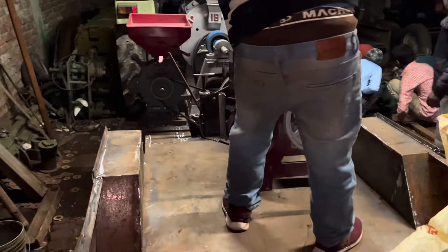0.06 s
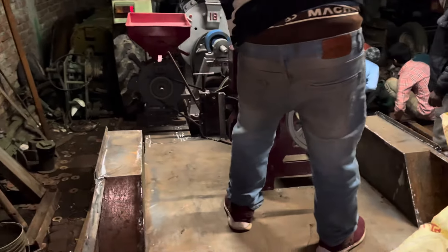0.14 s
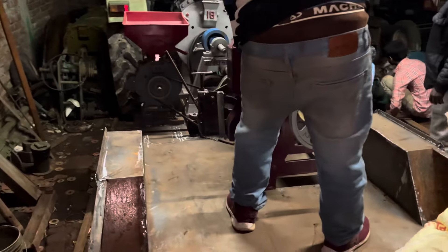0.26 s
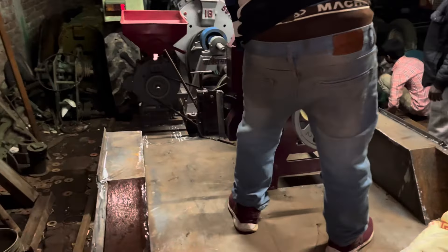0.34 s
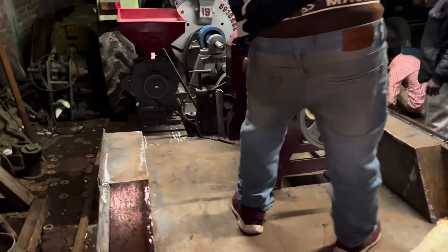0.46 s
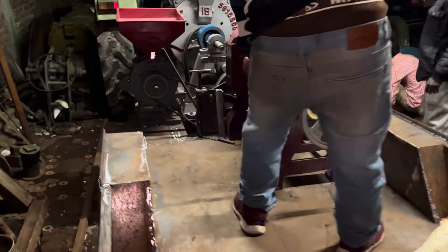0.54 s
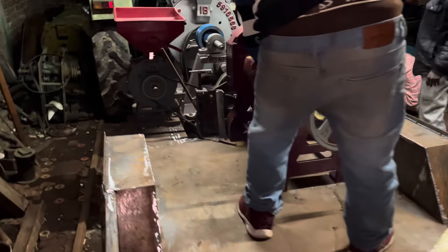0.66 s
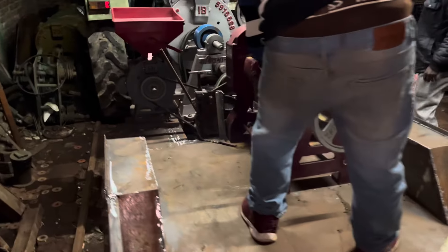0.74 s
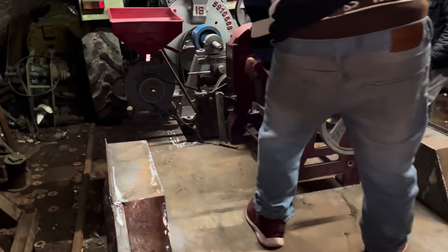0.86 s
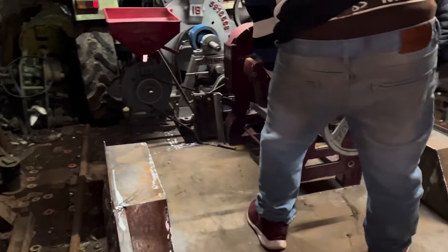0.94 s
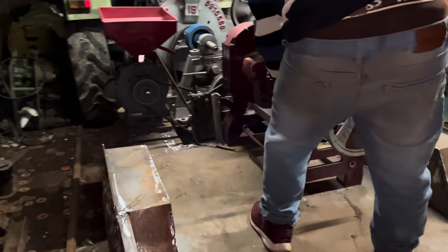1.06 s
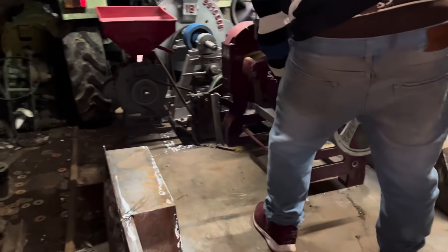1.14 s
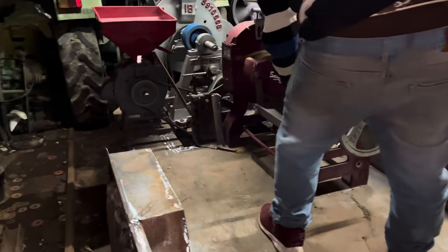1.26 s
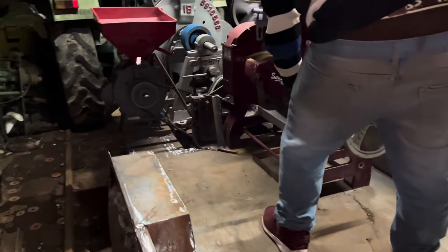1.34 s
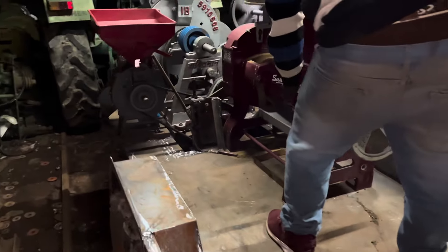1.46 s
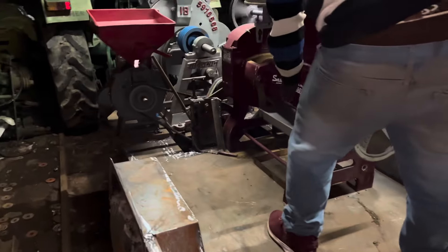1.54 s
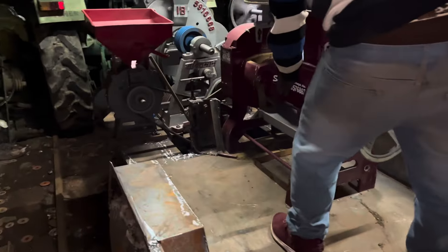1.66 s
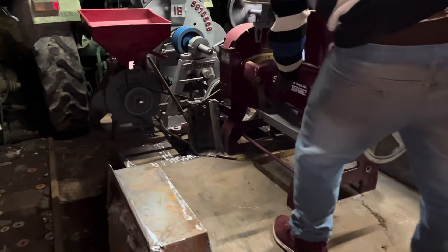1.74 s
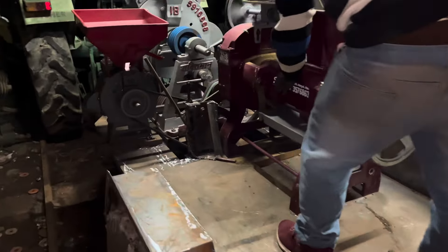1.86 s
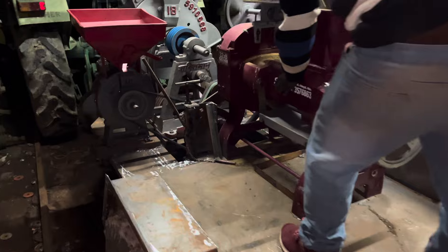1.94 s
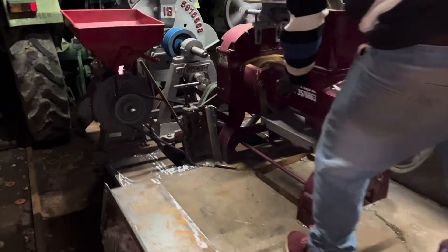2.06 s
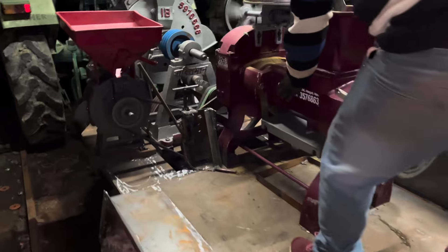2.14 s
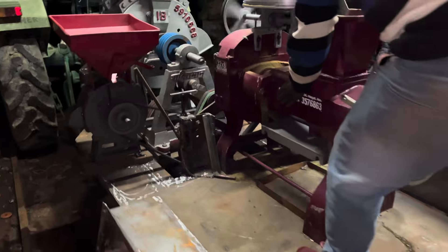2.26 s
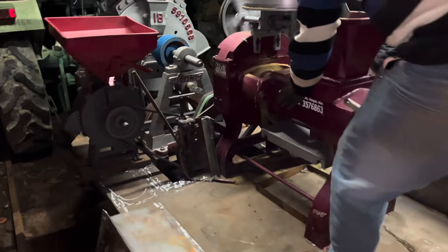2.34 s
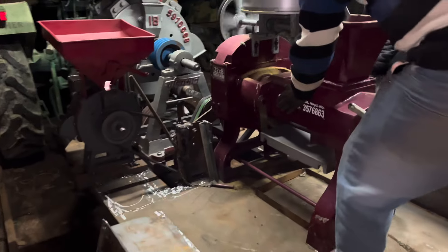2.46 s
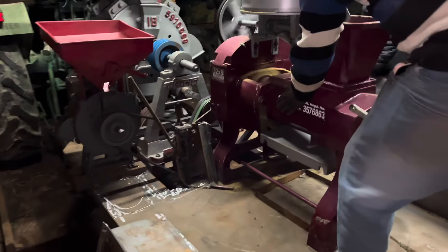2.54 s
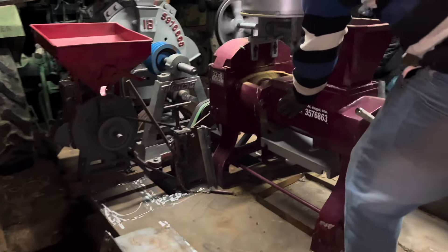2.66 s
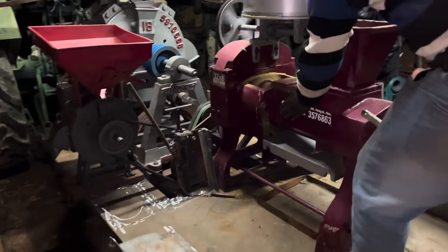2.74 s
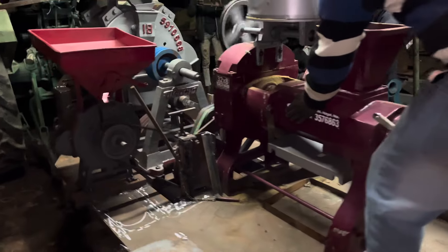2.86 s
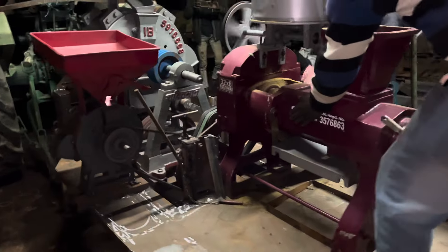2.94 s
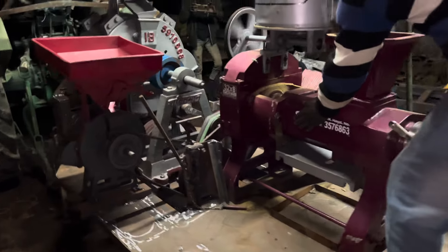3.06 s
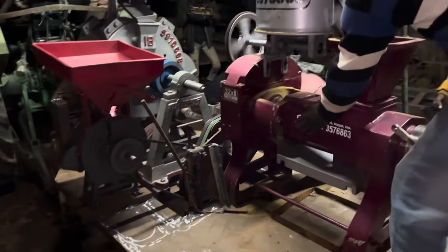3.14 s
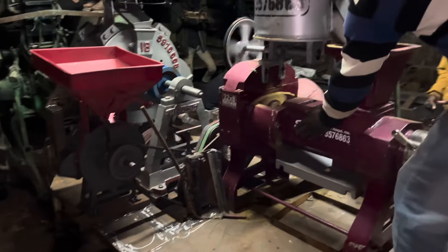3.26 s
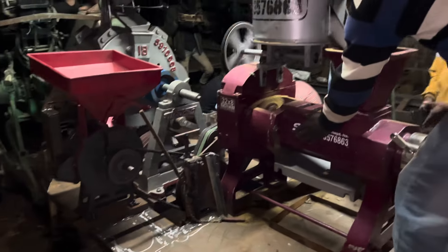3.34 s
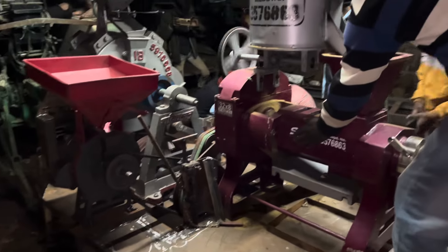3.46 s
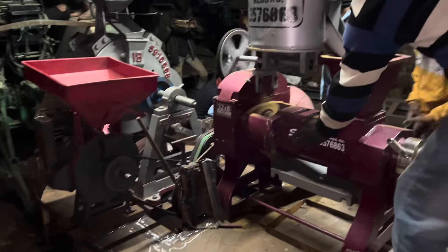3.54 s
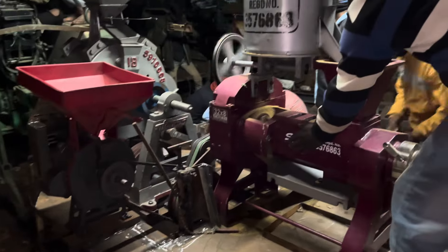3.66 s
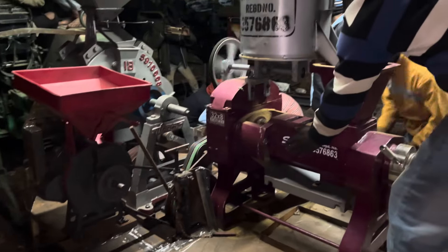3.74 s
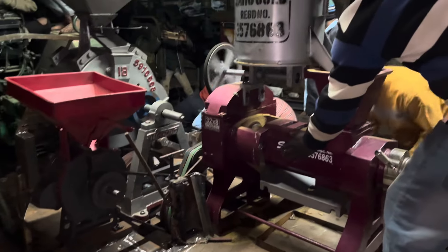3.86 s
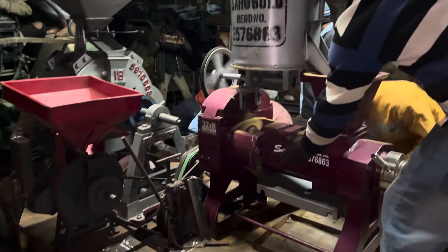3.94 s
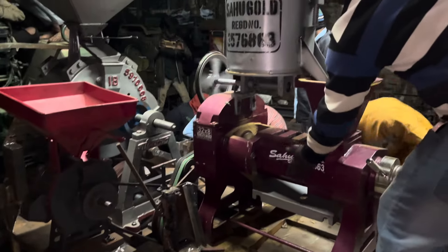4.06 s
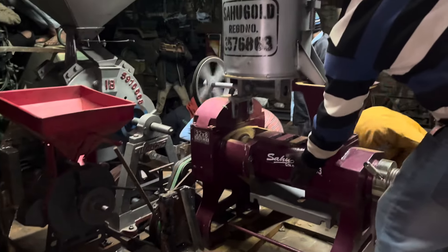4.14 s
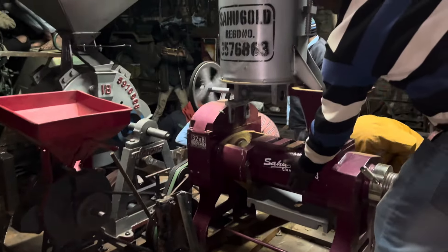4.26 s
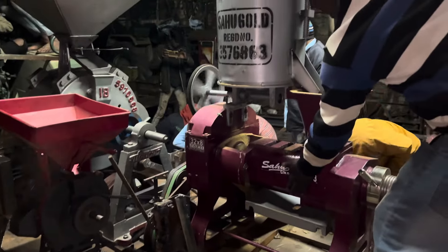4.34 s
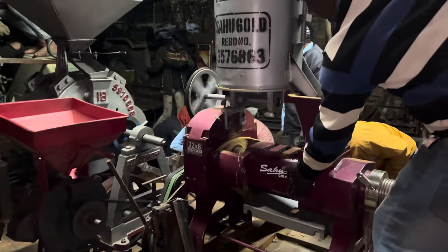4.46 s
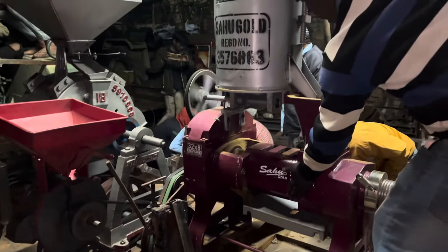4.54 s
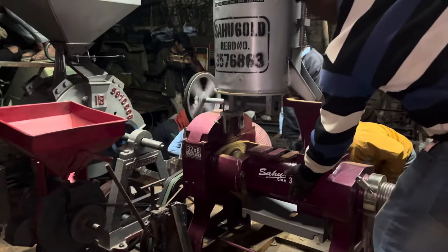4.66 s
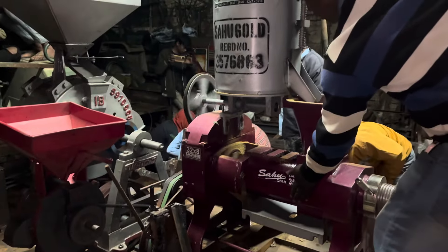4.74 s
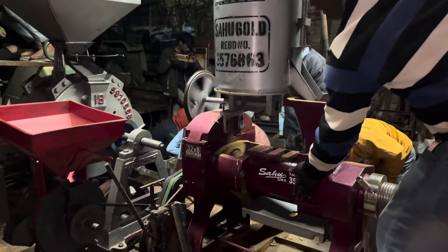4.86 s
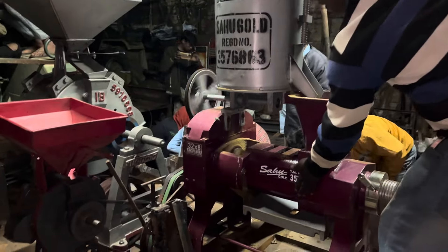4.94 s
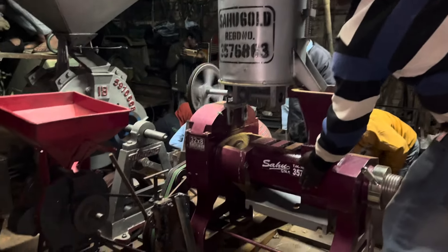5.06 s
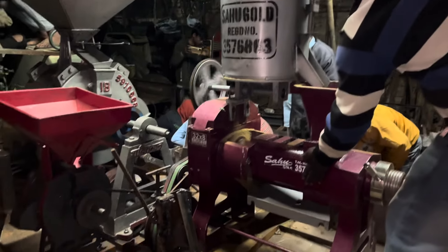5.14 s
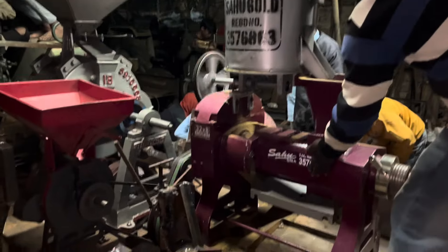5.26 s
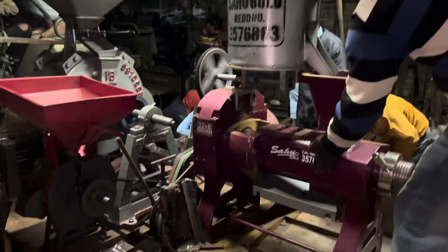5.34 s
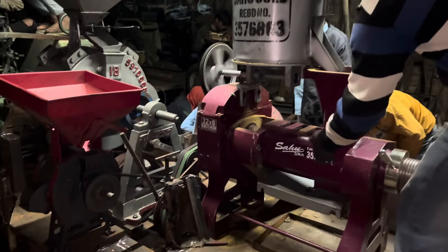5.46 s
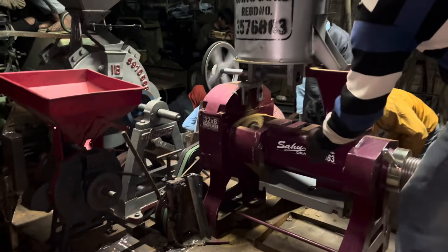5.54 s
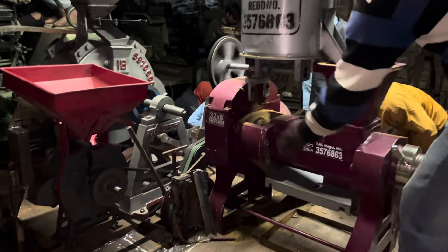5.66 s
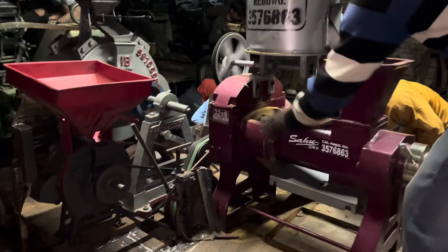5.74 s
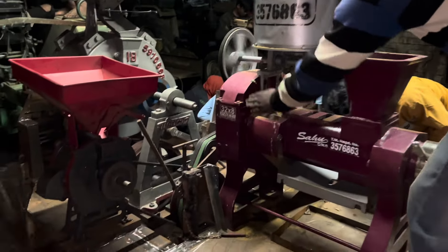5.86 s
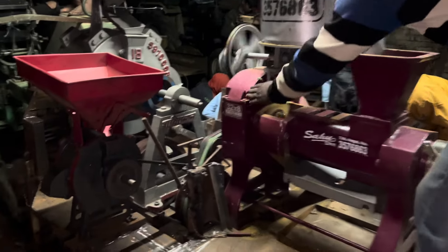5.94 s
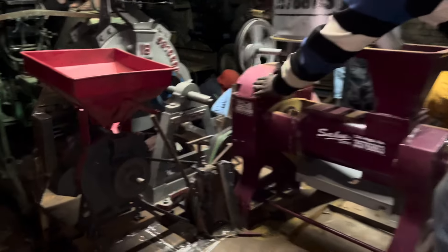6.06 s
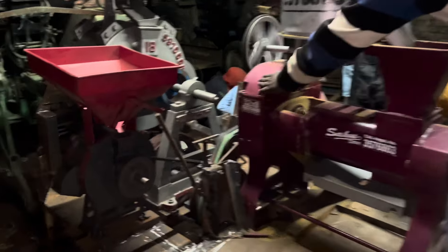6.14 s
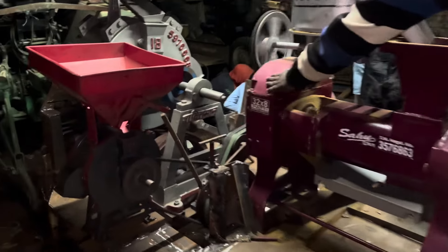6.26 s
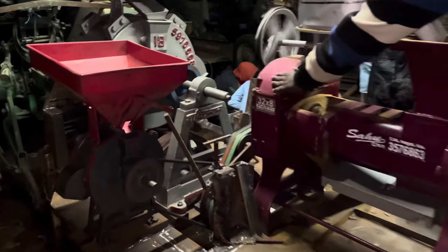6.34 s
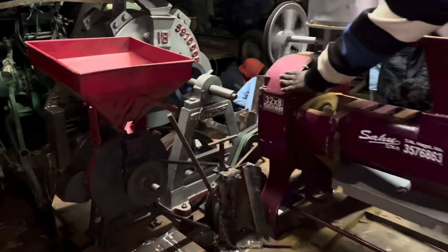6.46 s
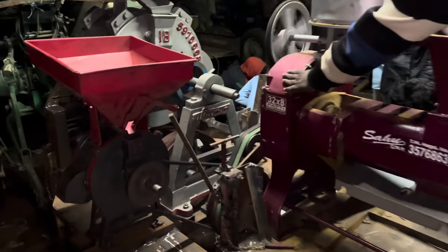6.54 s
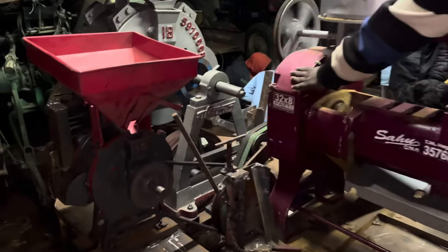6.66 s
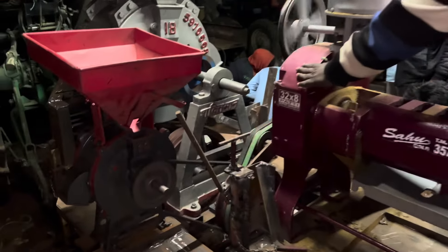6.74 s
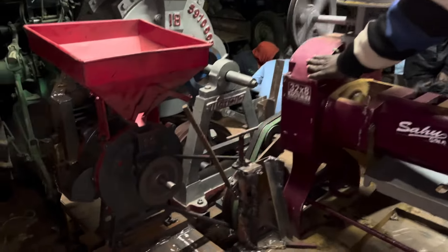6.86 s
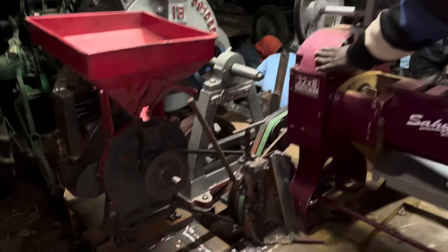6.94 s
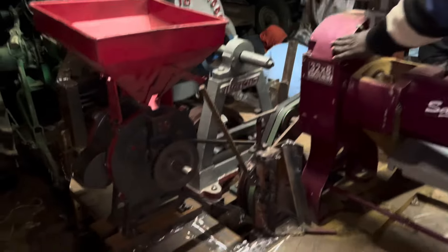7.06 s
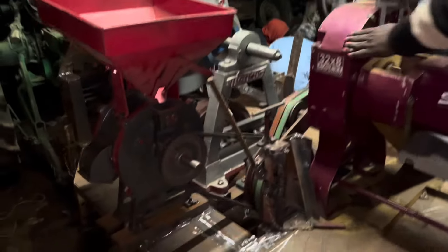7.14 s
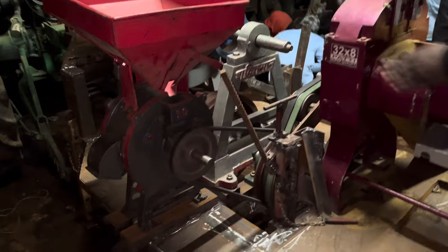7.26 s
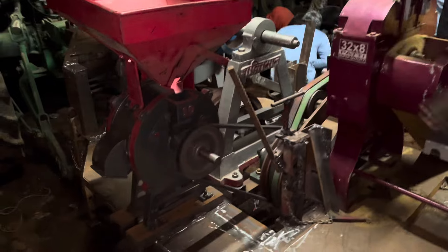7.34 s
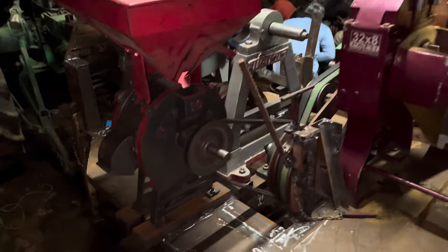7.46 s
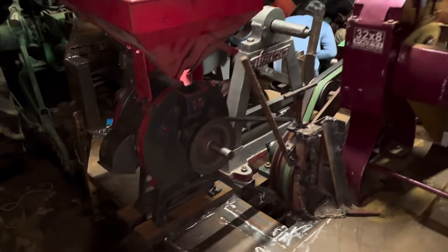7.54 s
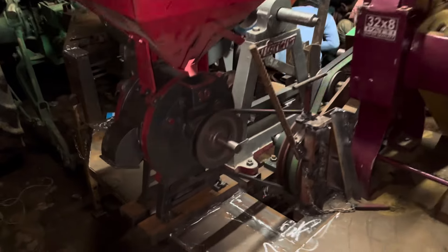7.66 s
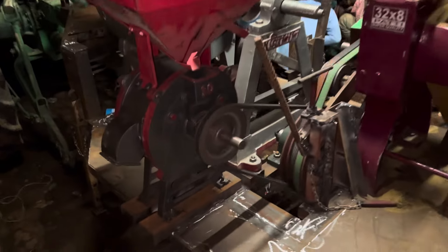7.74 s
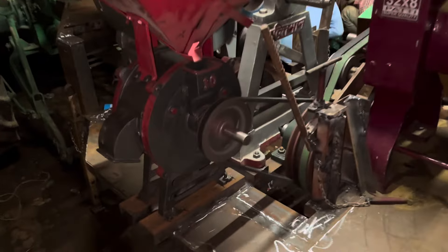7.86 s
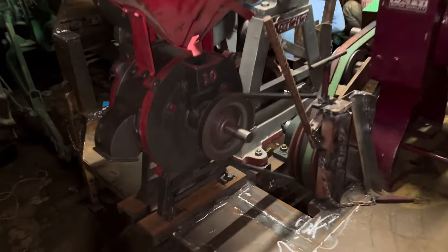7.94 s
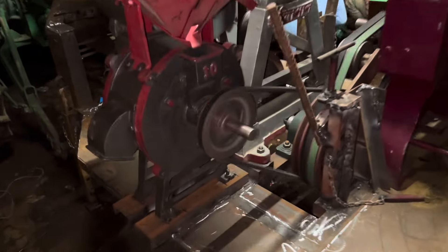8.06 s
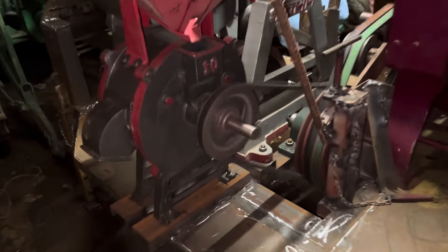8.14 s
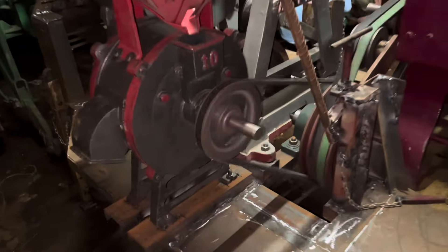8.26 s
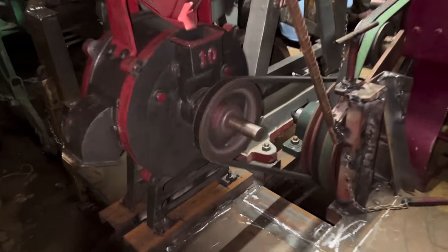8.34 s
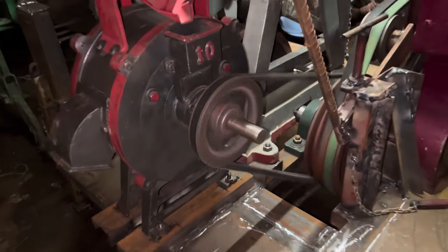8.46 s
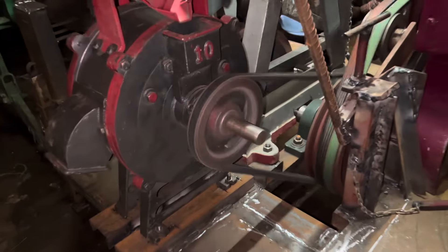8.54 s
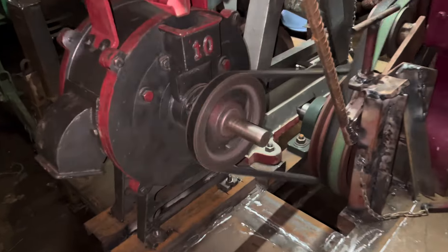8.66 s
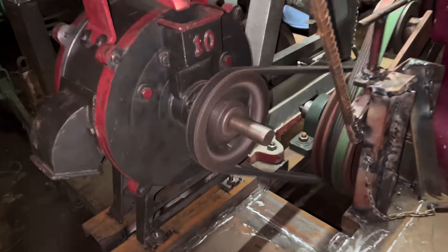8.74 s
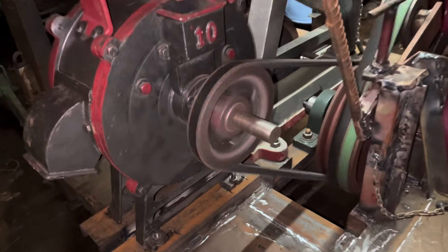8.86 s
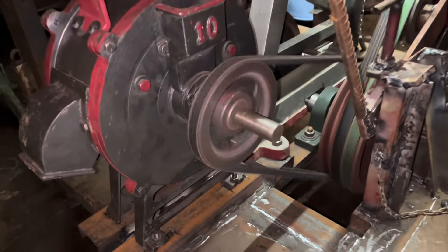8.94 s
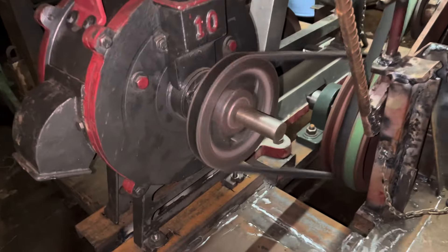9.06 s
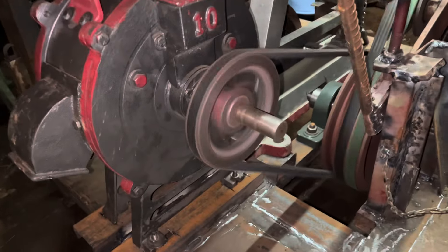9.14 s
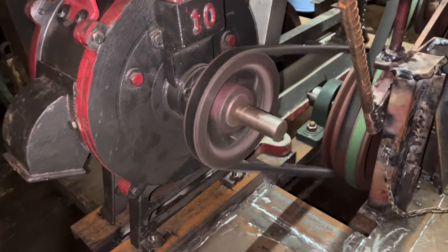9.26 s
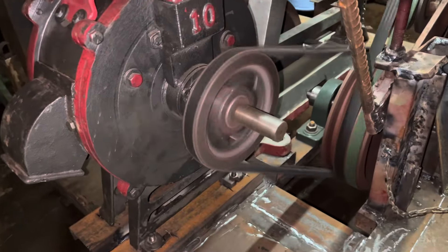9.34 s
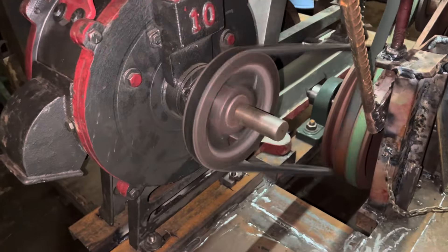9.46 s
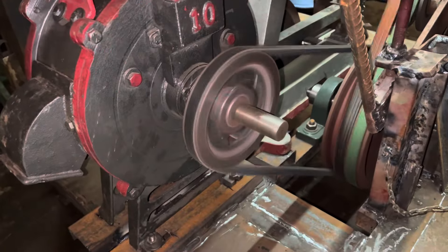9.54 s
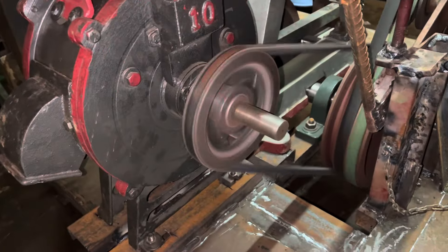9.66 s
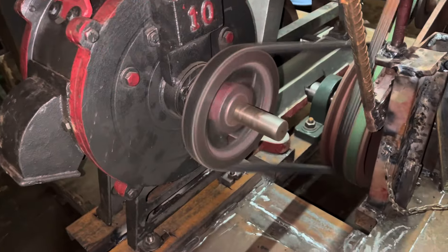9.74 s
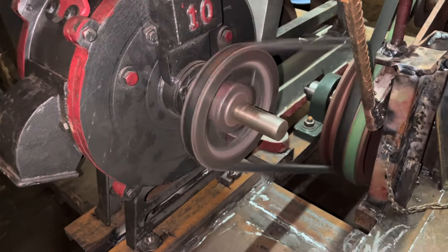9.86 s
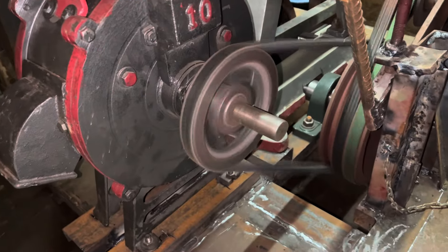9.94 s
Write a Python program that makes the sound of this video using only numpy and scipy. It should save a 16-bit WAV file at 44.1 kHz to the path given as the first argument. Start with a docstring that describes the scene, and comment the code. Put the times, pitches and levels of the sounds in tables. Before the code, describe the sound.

A slow single-cylinder engine thumps steadily under the loud roar and hum of belt-driven mills, growing louder in a workshop.

```python
"""Engine-driven mill workshop

A slow single-cylinder engine drives mills and presses by belt while the listener walks nearer.
Each firing thumps through pipe and floor and chuffs from the exhaust. Belts rumble, stones grind,
bearings whir and dust hisses; over that roar the shaken casings hum and metal parts ring.
Loose iron knocks now and then, and midway a hand pats a casing five times."""
import sys
import numpy as np
from scipy import signal
from scipy.fft import rfft, irfft
from scipy.io import wavfile
from scipy.ndimage import uniform_filter1d

SR = 44100
rng = np.random.default_rng(int(sys.argv[2]) if len(sys.argv) > 2 else 0)


def wrap_up_sound(samples):
    """Save the sound to the file named by the first command line argument, as 16-bit audio."""
    columns = np.atleast_2d(samples).T
    # keep every value between -1 and 1, then stretch to whole-number steps
    tamed = np.clip(columns, -1, 1)
    steps = np.round(tamed * 32767).astype(np.int16)
    wavfile.write(sys.argv[1], SR, steps)


N = 441000
TIME = np.arange(N) / SR
MID_WALK_S = 5

# stereo image: (f/Hz, left-right likeness/0-1, phase of right against left/rad, left over right/dB)
STEREO_IMAGE = [(50, .98, 0, 0), (200, .96, .2, 0), (450, .9, .4, 0), (750, .4, .3, -1), (1500, .3, 1.5, 0),
                (1800, .7, .1, 3), (2200, .7, -.2, .5), (3800, .5, -.9, 3), (5200, .3, -.5, 7),
                (5700, .4, 1.2, 3.5), (7000, .55, 2, 1), (7700, 1, np.pi, 0), (8900, 1, np.pi, 0),
                (9900, .6, 4.8, 0), (11100, 1, 2 * np.pi, 0), (13100, 1, 2 * np.pi, 0), (13800, .4, 6.7, 0),
                (14100, .5, 8.9, 0), (14600, 1, 3 * np.pi, 0)]
# the mills growing louder along the walk: (t/s, gain/dB)
WALK_GAIN = [(0, 0.5), (1, 2), (3, 2.5), (4.6, 4.5), (6, 4.5), (7.6, 5.5), (8.7, 7), (9.4, 7.5), (10, 6)]
# tone colours of belts, stones, bearings, hiss and palm: (f/Hz, relative level/dB)
BELT_COLOUR = [(25, -50), (40, -38), (70, -19), (95, -10.5), (125, -5), (150, -10), (180, -6), (250, -2),
               (330, -6), (440, 0), (520, -10), (570, -14), (650, -12), (720, -19), (1500, -80)]
STONE_COLOUR = [(400, -45), (700, -3), (850, -3), (1020, -2.5), (1300, 0), (1500, -3), (1800, -1),
                (2150, -3), (2300, -9), (3200, -16), (6000, -70)]
BEARING_COLOUR = [(2000, -25), (2700, -4), (3500, -3), (4300, 0), (5200, -2), (5500, -6), (6000, -11),
                  (7500, -10), (9500, -60)]
HISS_COLOUR = [(3000, -45), (4000, -20), (6000, 0), (8000, -2), (10000, -6), (12000, -9), (13500, -14),
               (14200, -18), (15200, -26)]
PALM_COLOUR = [(2000, -41), (3000, -3), (6000, -3), (7000, 4), (9000, -3), (12500, -1), (14000, -5),
               (15200, -14)]
# nulls of the room's standing waves: (f/Hz, half-width/Hz, depth/dB, deepest at t/s, half-span/s)
ROOM_NULLS = [(122, 26, -4, 4.7, 0.89), (343, 10, -1.5, 6.1, 3.4), (448.4, 6.2, -14, 2.7, 1.64),
              (259, 8.5, -5, 10.3, 1.8), (164, 9.6, -2.5, 8.1, 1.5), (702, 34, -5, 1.9, 9.1)]
# ringing metal parts: (f/Hz, base level/dB, drift/dB per s, swell/dB, crest t/s, crest spacing/s)
METAL_RINGS = [(1121, -46, .3, 5, 5.2, 7), (1206, -47.5, 0, 5, 1.8, 5.1), (1297, -45.5, .5, 2.5, 3.4, 5.9),
               (1394, -41.5, -.2, 5, 3.4, 5.5), (1636, -46.5, 1.1, 3, .1, 3.7),
               (1780, -47, .2, 3, 2.7, 3.9), (1922, -55, 1.4, 4.3, 1, 3.8), (2013, -51, .6, 4.9, 0, 3.1),
               (2152, -45.5, .2, 3, 4.2, 6.2), (2417, -50, 1, 3.5, 2.1, 5.9), (2600, -55, .9, 3.2, 2, 7.6),
               (3560, -55.5, -.2, 4.5, 2.7, 4.1), (3805, -55, 1.1, 6, .9, 5.9),
               (3870, -57, .8, 4.5, .6, 6.7), (4135, -56, 1.2, 3, 3.8, 3), (4303, -55, .4, 5, 6.4, 6.8),
               (4740, -52.5, .7, 2.5, 1.5, 2.5), (4890, -53.5, 1, 3, 1.8, 3.6),
               (4845, -57.5, .6, 8, 6.8, 7), (4360, -60, .8, 6, 6.6, 7), (5040, -59, .6, 4, 1.8, 5.9),
               (5155, -56, .6, 3, .6, 4.5), (7300, -54, -.1, 2.9, 1.8, 4.1)]
# humming casings: (f/Hz, width/Hz, throb per shaft turn/dB, its crest/turns, beat per firing/dB,
# its crest/cycles, base level/dB, drift/dB per s, swell/dB, crest t/s, crest spacing/s)
CASING_HUMS = [(199.2, 5.5, 2, 0.79, 2.5, 0.97, -31.5, -1, 3.5, 2.5, 6.3),
               (227.3, 15.2, -2, .13, -0.5, 0.57, -39, 1.95, 5, 1.63, 7.5),
               (270.6, 8.4, 0.5, 0.54, 3, 0.36, -36, 0.1, 6.5, 2.53, 5),
               (397.4, 15, 2, 0.093, 0, 0.73, -30.5, -1.13, 6, 4.4, 6.5),
               (422.7, 13.2, 3, .27, 1, 0.21, -35.5, 1.8, -1, 2.5, 4.5),
               (461.9, 21, 6, 0.96, 3, 0.39, -37, 1.5, 5, 1.83, 5),
               (654, 79, 1.5, .2, 1, .3, -45, 2.35, 1.5, 1.8, 6.3)]
# brief booms of a casing: (t/s, row of CASING_HUMS counted from 1, level/dB)
CASING_BOOMS = [(4.215, 4, -18), (4.455, 4, -15), (4.675, 4, -18), (4.715, 4, -15), (4.839, 4, -17),
                (5.007, 4, -18), (5.328, 4, -19), (6.835, 6, -19), (8.083, 5, -18), (8.275, 2, -18),
                (8.361, 5, -20), (8.456, 2, -18), (8.56, 2, -14), (8.56, 5, -17), (8.694, 2, -17),
                (8.826, 2, -18), (8.828, 5, -18), (9.001, 2, -18), (9.121, 2, -19), (9.398, 2, -19),
                (9.689, 2, -19), (9.701, 5, -16), (9.827, 2, -19), (9.937, 5, -19)]
# one casing or part singing out: (t/s, f/Hz, level/dB)
RING_FLARES = [(.79, 199, -21), (1.27, 199, -17), (1.55, 199, -20), (2.76, 1780, -34), (3.13, 2140, -33),
               (3.18, 199, -19), (3.23, 1400, -32), (3.46, 199, -20), (3.52, 1400, -32), (3.73, 1410, -32),
               (4.61, 2155, -36), (4.86, 2155, -35), (5.38, 1121, -35), (5.55, 1420, -33),
               (5.61, 1121, -31), (5.83, 1121, -32), (6.01, 1121, -34), (6.18, 4300, -42),
               (6.28, 1780, -32), (6.32, 1410, -33), (6.61, 4310, -41), (6.72, 4850, -38),
               (6.92, 4330, -41), (7.07, 3805, -39), (7.18, 4860, -41), (7.27, 3805, -39), (7.5, 272, -22),
               (7.6, 4350, -41), (8.5, 2420, -36)]
# dull knocks among the machines: (t/s, level/dB)
IRON_KNOCKS = [(4.414, -21), (4.69, -26), (4.955, -22), (6.22, -24), (7.991, -26), (8.5, -23), (8.778, -23),
               (9.414, -26), (9.758, -26)]
# pats on a casing: (t/s, level/dB, rise/s)
HAND_PATS = [(4.19, -29, .015), (4.4827, -30, .004), (4.7426, -29.5, .006), (5.005, -24, .02),
             (5.2729, -30.5, .006)]
# engine speed at each whole second: (rate/firings per s)
FIRING_RATE = [6.925, 6.666, 6.713, 6.764, 6.716, 7.001, 7.319, 7.431, 7.404, 7.221, 7.09]
# modes of pipe and floor that a firing rings: (f/Hz, relative level/dB, delay/s, time to peak/s)
PIPE_MODES = [(49.2, 4.5, 0.0087, 0.024), (98, -4.5, 0.0041, 0.031), (83.3, -10.5, 0.0031, 0.046),
              (115, -20, 0.0026, 0.027), (62, -6, 0.0462, 0.0067)]
# engine balance along the walk: (t/s, deep thump gain/dB, upper thump gain/dB,
# wall echo against thump/dB, chuff level/dB)
ENGINE_MIX = [(0, -29.5, -33, -20, -40.5), (1.5, -27, -28, -18, -40.5), (4.5, -24.5, -23.5, -14, -39),
              (6.2, -29, -23, -10, -45), (8, -30, -23.5, -12, -43), (10, -29, -23, -13, -40)]


def gain_of(db):
    """Decibels to amplitude."""
    return 10 ** (np.asarray(db) / 20)


def unit_rms(x):
    """Scale a signal to an RMS of one."""
    return x / np.sqrt(np.mean(x ** 2) + 1e-20)


def at_pitch(table, hz, column=1):
    """Read a table column along a log-frequency axis."""
    columns = np.transpose(table)
    return np.interp(np.log(hz + 1), np.log(columns[0] + 1), columns[column])


def at_time(table, column, t=TIME):
    """Read a table column as a fader move."""
    columns = np.transpose(table)
    return np.interp(t, columns[0], columns[column])


def bell(x, centre, half_width):
    """Gaussian bump of height one."""
    return np.exp(-.5 * ((x - centre) / half_width) ** 2)


def patches(shape, bins, frames):
    """Random hills and dips, smooth across pitch and time."""
    across_pitch = uniform_filter1d(rng.standard_normal(shape), bins, axis=0)
    return unit_rms(uniform_filter1d(across_pitch, frames, axis=1))


def stereo_noise():
    """White noise, nearly mono in the bass, with width and phase varying higher up."""
    hz = np.fft.rfftfreq(N, 1 / SR)
    left, other = rfft(rng.standard_normal((2, N)))
    likeness = np.clip(at_pitch(STEREO_IMAGE, hz), 0, 1)
    phase = at_pitch(STEREO_IMAGE, hz, column=2)
    right = (likeness * left + np.sqrt(1 - likeness ** 2) * other) * np.exp(1j * phase)
    lean = gain_of(at_pitch(STEREO_IMAGE, hz, column=3) / 2)
    return irfft(np.array([left * lean, right / lean]), N)


def roar(colour, patchy_db, bins, frames, size):
    """Coloured noise; standing waves make patches in it that drift as the listener moves."""
    hz, _, spectrum = signal.stft(stereo_noise(), SR, nperseg=size, noverlap=size * 3 // 4)
    patch_db = patchy_db * patches(spectrum.shape[1:], bins, frames)
    spectrum = spectrum * gain_of(at_pitch(colour, hz)[:, None] + patch_db)
    return unit_rms(signal.istft(spectrum, SR, nperseg=size, noverlap=size * 3 // 4)[1][:, :N])


def bursts(times, levels_db, t60_s, rise_s):
    """Envelope of short puffs: quick attack, exponential decay."""
    out, t = np.zeros(N + SR), np.arange(SR // 4) / SR
    for start, db, rise in np.broadcast(times, levels_db, rise_s):
        out[round(start * SR):][:len(t)] += gain_of(db - 60 * t / t60_s) * (1 - np.exp(-t / rise))
    return out[:N]


def swell_db(t, base_db, drift, depth_db, crest_s, spacing_s):
    """Level of one tone along the walk: a steady drift and a regular swell."""
    return base_db + drift * (t - MID_WALK_S) + depth_db * np.cos(2 * np.pi * (t - crest_s) / spacing_s)


def engine_cycles():
    """Running count of engine cycles, starting partway through one."""
    rate = np.interp(TIME, np.arange(len(FIRING_RATE)), FIRING_RATE)
    return .533 + np.cumsum(rate) / SR


def uneven_feed(depth_db, samples):
    """The load on the mills wanders: a slow random gain."""
    wander = uniform_filter1d(uniform_filter1d(rng.standard_normal(N), samples), samples)
    return gain_of(depth_db * unit_rms(wander))


def mills():
    """Belts rumble, stones grind, bearings whir, dust hisses, parts rattle; all but the belts surge."""
    load, near_db = uneven_feed(0.82, samples=3000), at_time(WALK_GAIN, column=1)
    rumble = gain_of(-25.5 + 0.57 * near_db) * roar(BELT_COLOUR, 0.93, bins=2, frames=20, size=4096)
    grind = gain_of(-35 + near_db) * roar(STONE_COLOUR, 3.2, bins=2, frames=40, size=4096)
    whir = gain_of(-43 + 1.15 * near_db) * roar(BEARING_COLOUR, 3.8, bins=3, frames=14, size=2048)
    hiss = gain_of(-49.5 + near_db) * roar(HISS_COLOUR, 1.0, bins=3, frames=30, size=1024)
    rattle = gain_of(-41.5 + near_db) * roar(STONE_COLOUR, 3.1, bins=10, frames=12, size=1024)
    return rumble + load * (grind + rattle + whir) + uneven_feed(1.3, samples=2500) * hiss


def dead_spots(sound):
    """Narrow bands fade where the listener passes a null of the room."""
    hz, t, spectrum = signal.stft(sound, SR, nperseg=8192, noverlap=4096)
    dip_db = sum(db * np.outer(bell(hz, pitch, width), bell(t, deepest_s, span))
                 for pitch, width, db, deepest_s, span in ROOM_NULLS)
    return signal.istft(spectrum * gain_of(dip_db), nperseg=8192, noverlap=4096)[1][:, :N]


def metal_rings():
    """Each ringing part is a narrow band of noise that breaks up as the part shakes."""
    hz, t, spectrum = signal.stft(stereo_noise(), SR, nperseg=4096, noverlap=3072)
    power = 0
    for pitch, *swell in METAL_RINGS:
        width_hz = 4 + .004 * pitch  # higher modes are wider
        band = 1 / (1 + ((hz - pitch) / width_hz) ** 2) ** 2
        power = power + np.outer(band / band.mean(), gain_of(2 * swell_db(t, *swell)))
    flutter_db = 2.62 * patches(power.shape, bins=5, frames=5)
    drift_db = 0.19 * patches(power.shape, bins=9, frames=20)
    spectrum = spectrum * gain_of(flutter_db + drift_db) * np.sqrt(power)
    return signal.istft(spectrum, nperseg=4096, noverlap=3072)[1][:, :N]


def casing_booms(casing):
    """A jolt of the drive makes one casing boom briefly: the extra amplitude of its hum."""
    return sum(gain_of(db) * bell(TIME, crest_s, half_width=0.015)
               for crest_s, row, db in CASING_BOOMS if row == casing)


def casing_hums():
    """Gears and stones shake each casing at random, so it hums near its own pitch."""
    noise, cycles, out = stereo_noise(), engine_cycles(), 0
    for casing, row in enumerate(CASING_HUMS, 1):
        hz, width, throb_db, throb_crest, beat_db, beat_crest, *swell = row
        radius = np.exp(-np.pi * width / SR)
        poles = [1, -2 * radius * np.cos(2 * np.pi * hz / SR), radius * radius]
        band = unit_rms(signal.lfilter([1, 0, -1], poles, noise))
        tone = unit_rms(signal.lfilter([1], poles, band))  # second pass for steep skirts
        strength = np.sqrt(abs(uniform_filter1d(tone ** 2, size=1500)) + 0.022)
        tone = unit_rms(tone / strength ** 0.25)  # the steady drive keeps a hum from dying out
        throb = throb_db * np.cos(2 * np.pi * (cycles / 2 - throb_crest))
        beat = beat_db * np.cos(2 * np.pi * (cycles - beat_crest))
        out = out + gain_of(swell_db(TIME, *swell) + throb + beat) * tone
        envelope = np.sqrt(2 * abs(uniform_filter1d((tone ** 2).mean(0), size=700)) + .12)
        out = out + casing_booms(casing) * tone / envelope
    return out


def ring_flares():
    """A shaken part rings up for a moment: a narrow, slightly rough tone that swells and fades."""
    noise, out, span = stereo_noise(), np.zeros((2, N)), SR // 4
    t = np.arange(-span, span) / SR
    for crest_s, hz, db in RING_FLARES:
        window = slice(round(crest_s * SR) - span, round(crest_s * SR) + span)
        b, a = signal.iirpeak(hz, Q=125, fs=SR)
        tone = unit_rms(signal.lfilter(b, a, signal.lfilter(b, a, noise[:, window])))
        envelope = np.sqrt(abs(signal.hilbert(tone.mean(0))) ** 2 + .2)
        out[:, window] += gain_of(db) * bell(t, 0, half_width=.06) * tone / envelope
    return out


def iron_knocks():
    """Loose iron parts bump: soft bursts, more scuff than clack, coloured like the grinding."""
    times, levels_db = np.transpose(IRON_KNOCKS)
    envelope = bursts(times, levels_db, t60_s=0.39, rise_s=.025)
    return envelope * roar(STONE_COLOUR, 0.85, bins=3, frames=8, size=512)


def hand_pats():
    """A palm slaps and slides on dusty sheet metal: a bright rustle."""
    times, levels_db, rises = np.transpose(HAND_PATS)
    envelope = bursts(times, levels_db, t60_s=0.16, rise_s=rises)
    return envelope * roar(PALM_COLOUR, 3.5, bins=4, frames=3, size=256)


def engine_thumps(firings):
    """Each firing rings the low modes of pipe and floor, and the far wall throws the thump back."""
    deep_below_hz, wall_delay_s = 70, 0.0743
    t, thumps = np.arange(SR // 3) / SR, 0
    for hz, db, delay, peak_s in PIPE_MODES:
        age = np.maximum(t - delay, 0)
        envelope = (age / peak_s * np.exp(1 - age / peak_s)) ** 2
        mode = -gain_of(db) * envelope * np.sin(2 * np.pi * hz * age)
        fader_db = at_time(ENGINE_MIX, column=1 if hz < deep_below_hz else 2)
        thumps = thumps + signal.oaconvolve(firings * gain_of(fader_db), mode)[:N]
    echo = gain_of(at_time(ENGINE_MIX, column=3)) * np.interp(TIME - wall_delay_s, TIME, thumps)
    return gain_of([[.2], [-.2]]) * (thumps + echo)  # a touch to the left


def exhaust_chuffs(firings):
    """A puff of hiss follows each thump out of the pipe, no two equally loud."""
    times, lag_s = TIME[firings > 0], 0.0074
    levels_db = at_time(ENGINE_MIX, column=4, t=times) + 1.2 * rng.standard_normal(len(times))
    envelope = bursts(times + lag_s, levels_db, t60_s=0.21, rise_s=0.0033)
    return envelope * roar(HISS_COLOUR, 2.1, bins=4, frames=4, size=512)


def scene():
    """The engine over the bed of mills and casings, with rings, knocks and pats on top."""
    firings = np.diff(np.floor(engine_cycles()), prepend=0)  # one impulse per cycle
    engine = engine_thumps(firings) + exhaust_chuffs(firings)
    bed = dead_spots(casing_hums() + mills())
    return engine + bed + metal_rings() + ring_flares() + iron_knocks() + hand_pats()


def record(dry):
    """The microphone drops the deepest bass and the very top."""
    low_cut = signal.butter(4, 38, "high", fs=SR, output="sos")
    high_cut = signal.firwin(511, 15200, window=("kaiser", 9), fs=SR)
    return signal.oaconvolve(signal.sosfilt(low_cut, dry), high_cut[None], "same")


dry = scene()
out = record(dry)
wrap_up_sound(out)
```